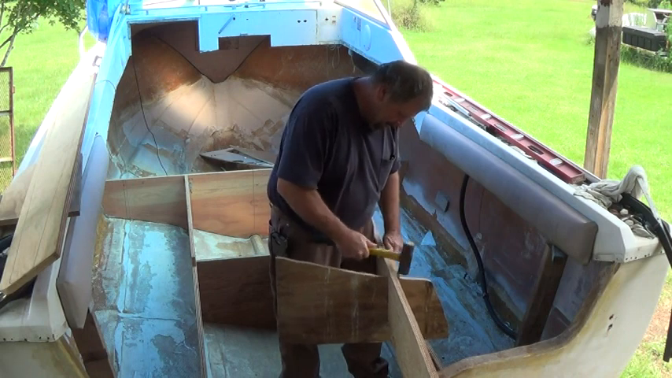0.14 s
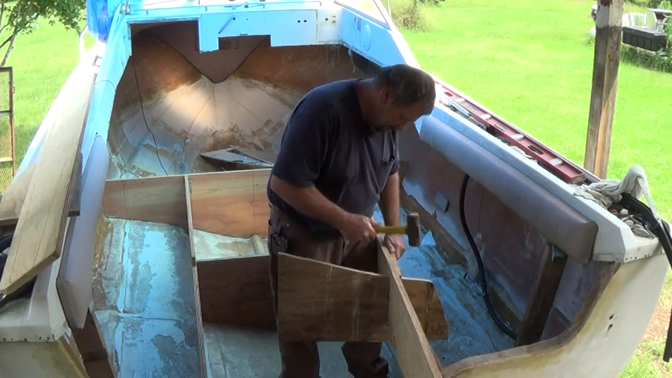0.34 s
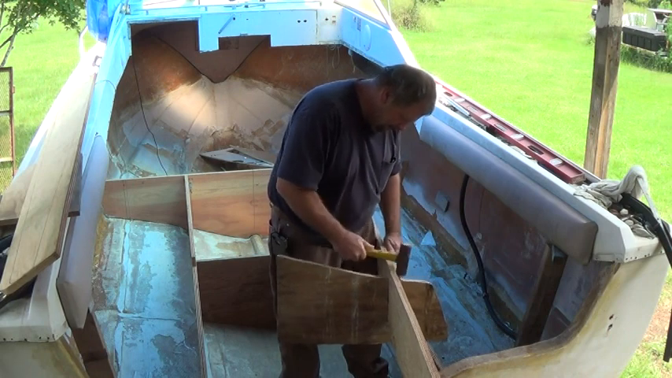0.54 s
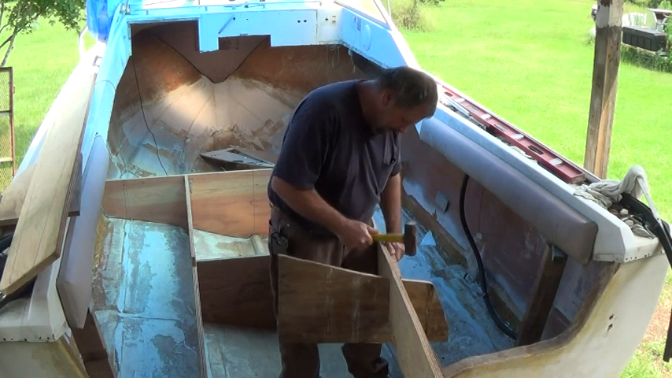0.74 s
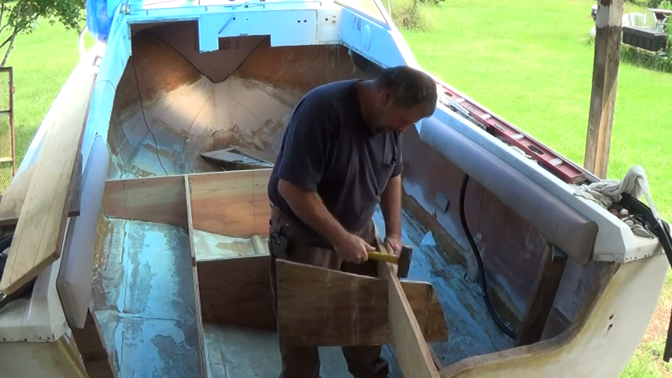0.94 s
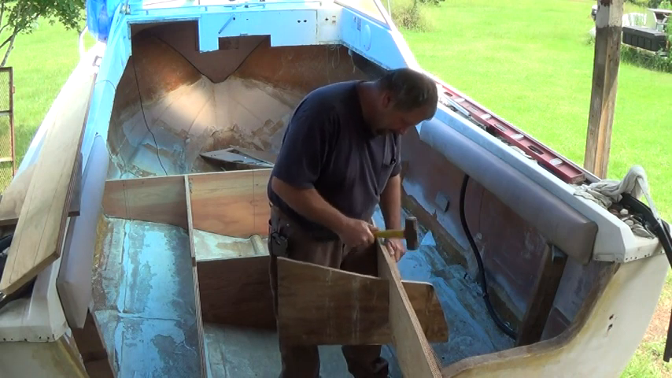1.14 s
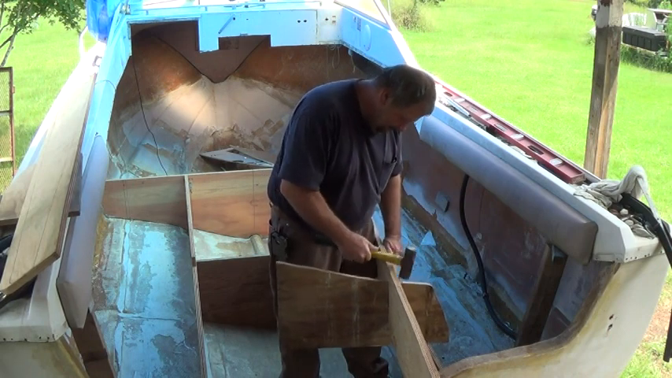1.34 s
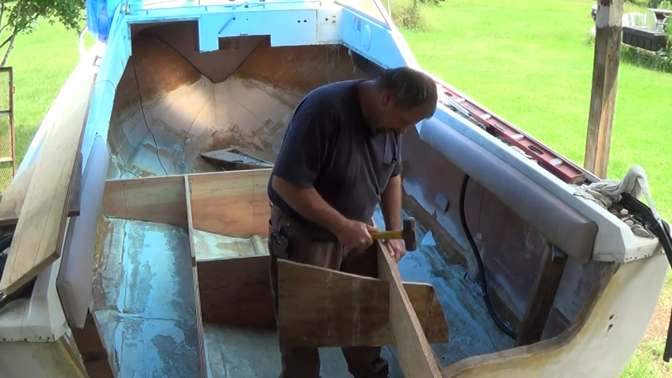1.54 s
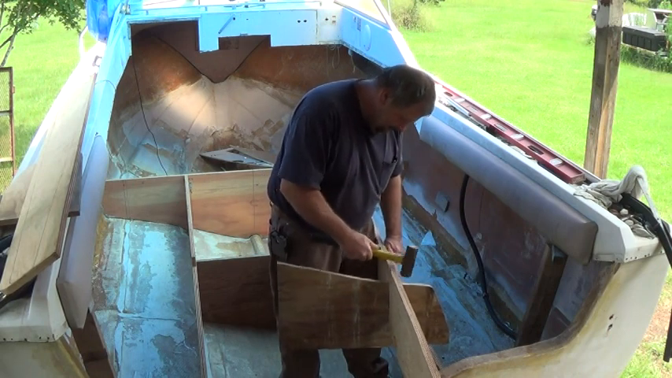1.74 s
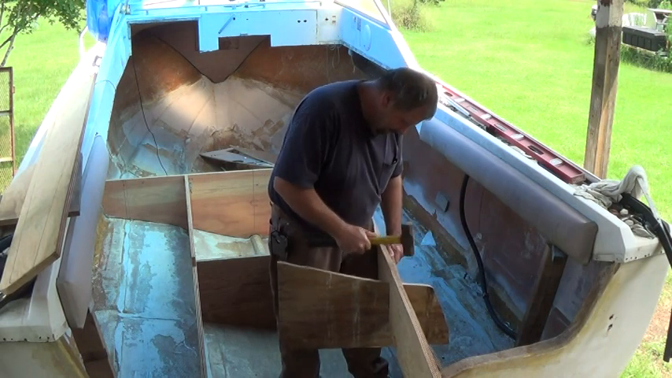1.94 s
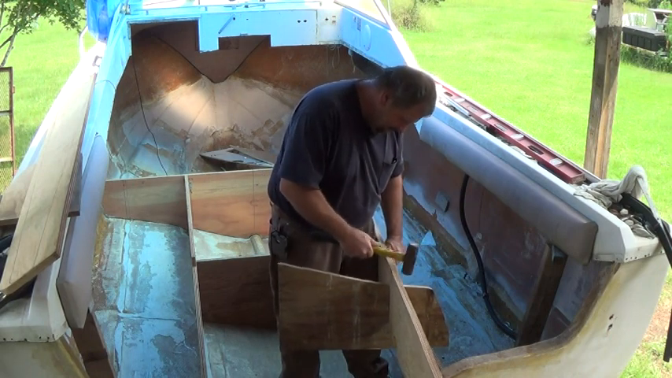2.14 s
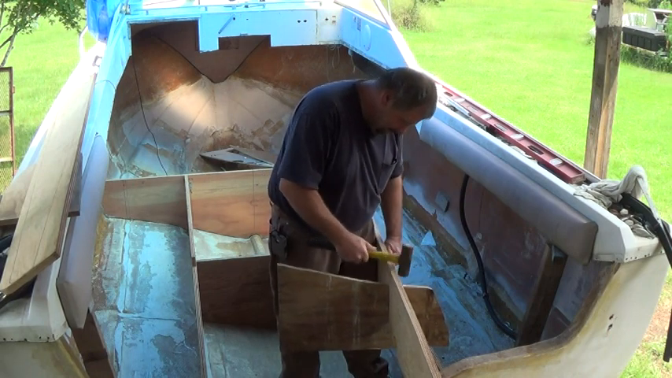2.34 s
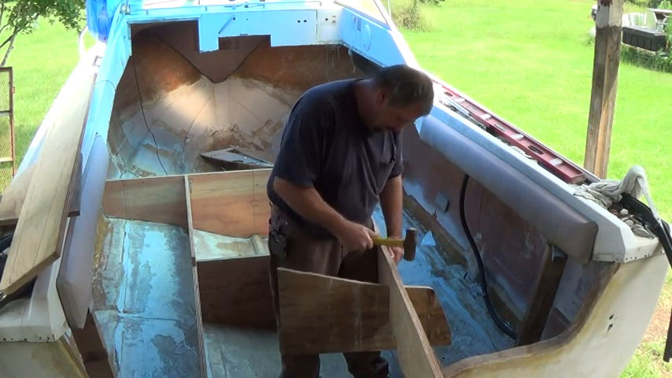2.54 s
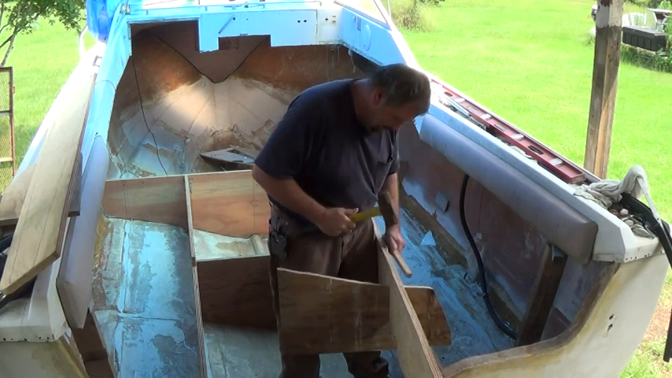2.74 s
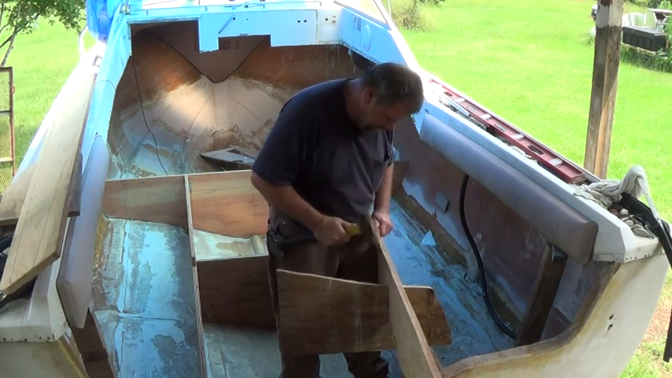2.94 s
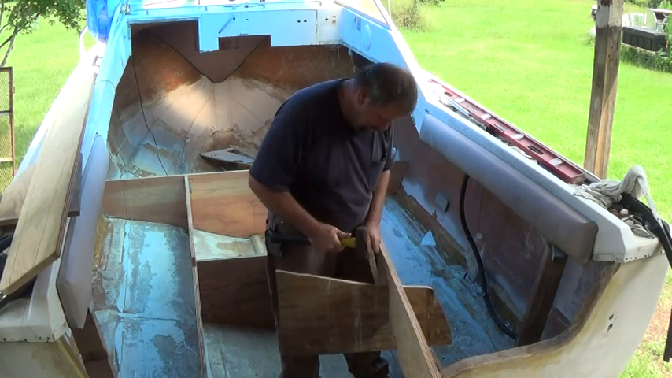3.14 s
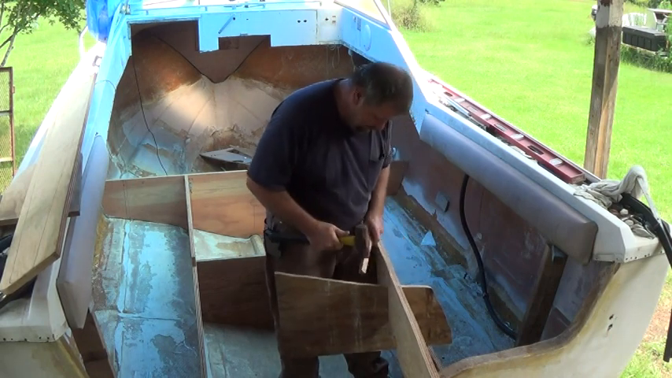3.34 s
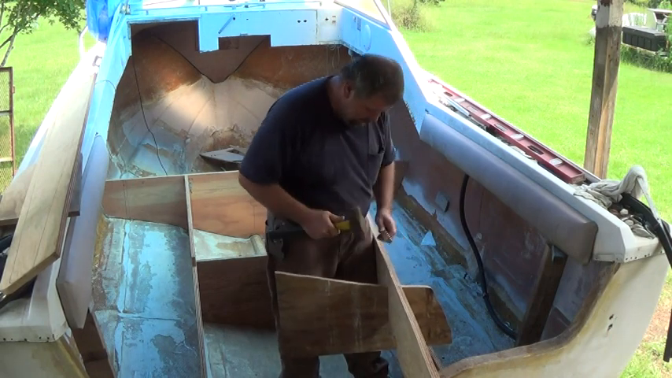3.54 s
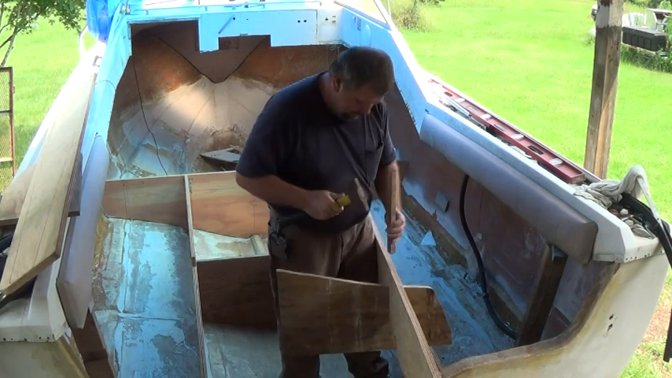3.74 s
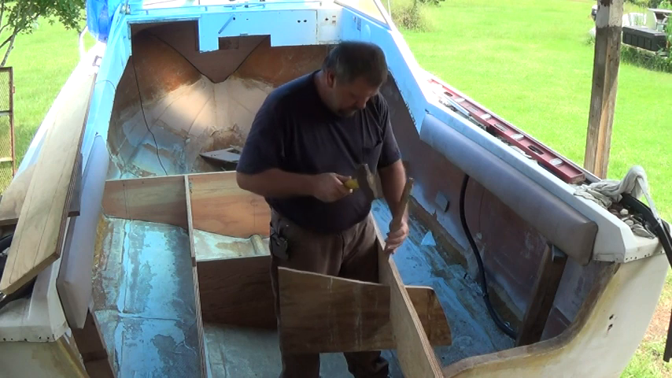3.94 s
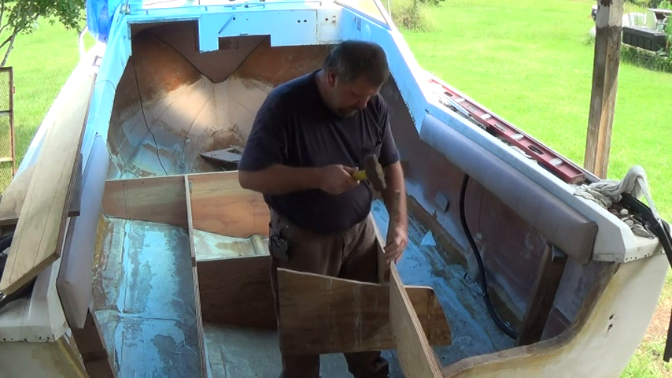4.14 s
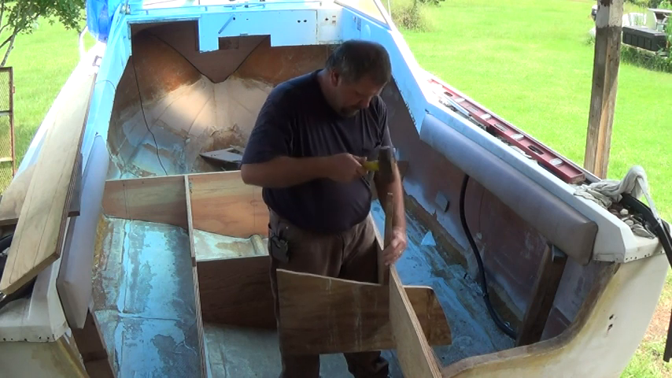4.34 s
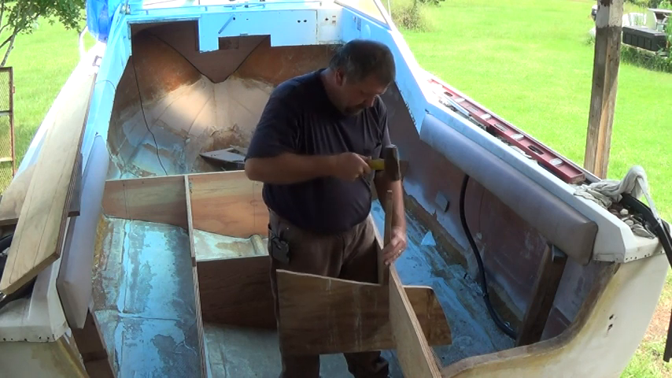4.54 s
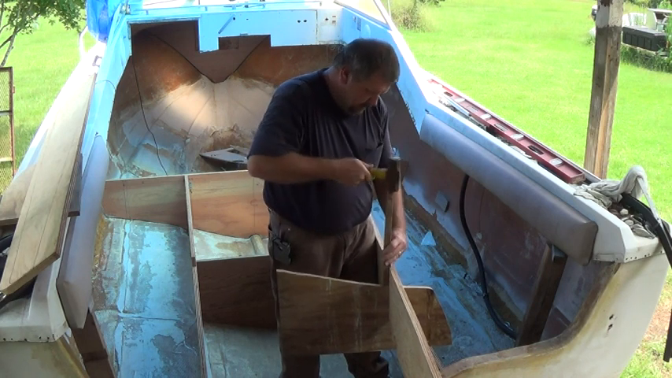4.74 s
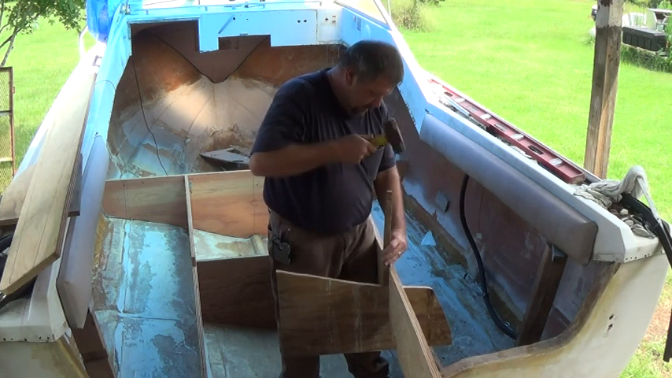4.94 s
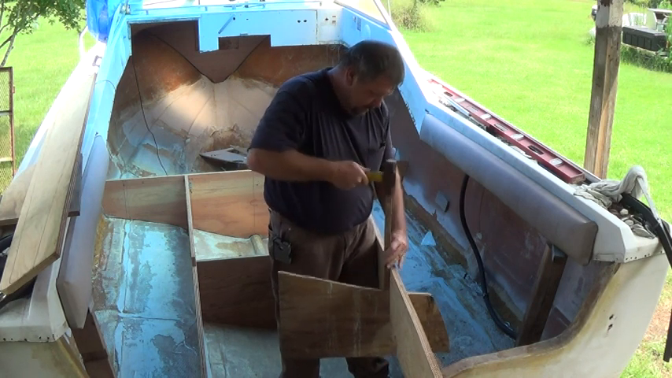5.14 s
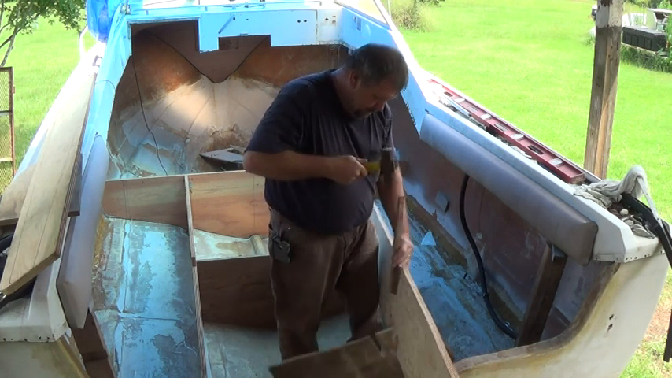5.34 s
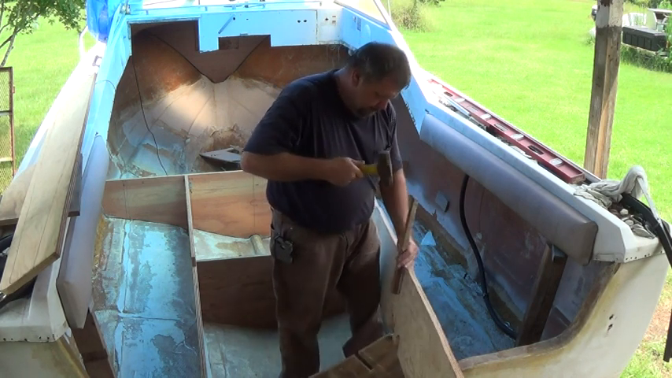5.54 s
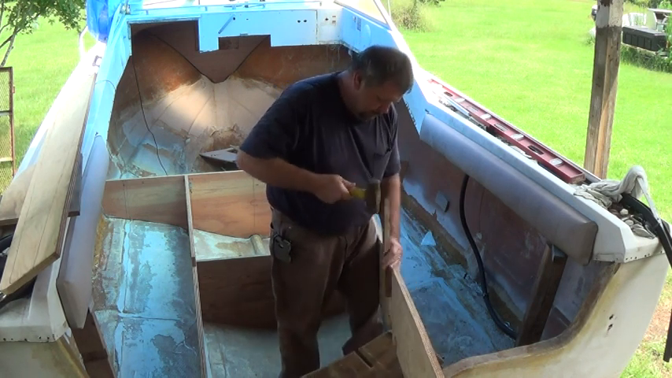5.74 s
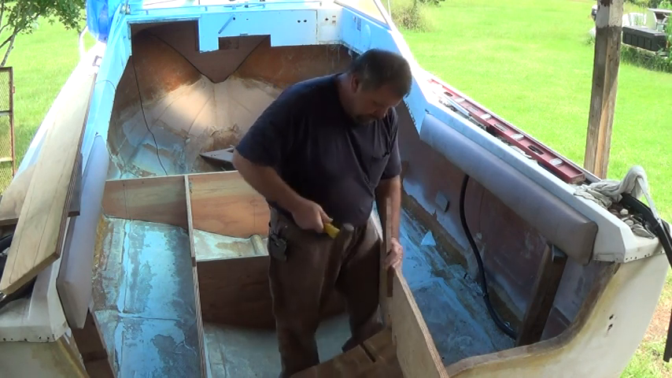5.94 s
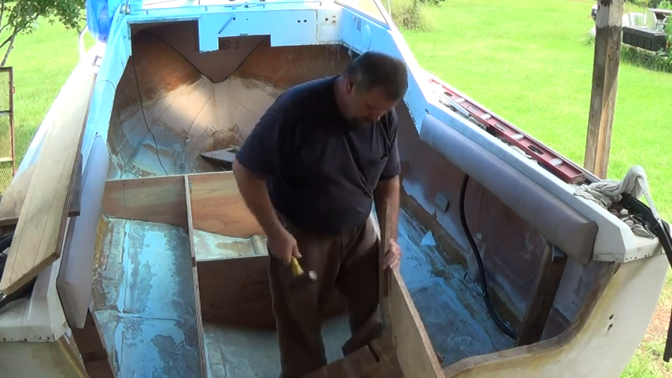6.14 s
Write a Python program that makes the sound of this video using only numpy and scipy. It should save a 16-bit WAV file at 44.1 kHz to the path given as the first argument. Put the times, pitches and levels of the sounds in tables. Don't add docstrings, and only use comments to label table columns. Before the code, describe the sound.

Outdoors under a shed roof, thin insect song and soft yard air lie behind loud, regular wooden knocks from a mallet on a steel chisel, each resonating briefly in the hull. The worker pauses with scuffs, faint squeaks, a chisel clunk and taps. A last blow brings a short falling grind, a heavy low thud, gritty ticks, a bounce and a final rub. Close stereo camera pickup, compressed peaks.

```python
import sys
import numpy as np
from scipy import signal
from scipy.fft import rfft, irfft
from scipy.io import wavfile
from scipy.ndimage import uniform_filter1d, minimum_filter1d

SR = 44100
rng = np.random.default_rng(int(sys.argv[2]) if len(sys.argv) > 2 else 0)


def how_loud(loudness_db):
    steps = np.asarray(loudness_db, float) / 20
    return 10 ** steps


def to_wav(sig):
    pcm = np.clip(np.atleast_2d(sig), -1, 1) * 32767
    pcm = np.round(pcm).astype(np.int16)
    wavfile.write(sys.argv[1], SR, pcm.T)


N = 272979


def evened(x):
    return x / np.sqrt(np.mean(x ** 2) + 1e-20)


def read(points, hz):
    f, value = np.transpose(points)
    return np.interp(np.log(hz + 1), np.log(f + 1), value)


def add(mix, s, sound):
    part = mix[:, round(s * SR):][:, :sound.shape[1]]
    part += sound[:, :part.shape[1]]


def coloured(spectrum, size):
    gain = how_loud(read(spectrum, np.fft.rfftfreq(size, 1 / SR)))
    white = rng.standard_normal((2, size))
    return evened(irfft(rfft(white) * gain, size))


def wander(hz):
    return evened(signal.lfilter([1], [1, -np.exp(-2 * np.pi * hz / SR)], rng.standard_normal(N)))


def lumps(size, width):
    return evened(signal.oaconvolve(rng.standard_normal(size), np.hanning(int(width)), "same"))


def stroke(t, top_s, rise_db_per_s, fall_db_per_s):
    return np.minimum(rise_db_per_s * (t - top_s), -fall_db_per_s * (t - top_s))


def modes(table, t, rise_cycles, spread_db):
    hz, db, t60 = np.transpose(table)[:, :, None]
    chance = rng.standard_normal((5, 2, len(table), 1))
    turn = 2 * np.pi * hz * (1 + 0.00492 * chance[0]) * t
    tone = np.sin(turn + 3 * chance[1])
    partner = 0.7 * np.sin(turn * (1 + 0.03 * chance[3]) + 3 * chance[4])
    swell = (1 - np.exp(-t * hz / rise_cycles)) ** 2
    decay = how_loud(db + spread_db * chance[2] - 60 * t / t60)
    return (decay * swell * (tone + partner)).sum(1)


# frequency in Hz, then likeness as a share, left-right level in dB or left's lead in radians.
HULL_PORTS = [
    [(30, .4), (60, .95), (150, .99), (300, .95), (600, .86), (1200, .84), (2400, .87), (5000, .91), (9000, .98), (12000, .985)],
    [(30, 2), (70, -3.5), (160, -7.5), (300, -7), (600, -3.4), (1200, -.9), (2400, -.2), (15000, -.5)],
    [(0, 0), (260, -0.7), (780, -0.3), (3790, -0.1), (7060, -0.1), (7750, -0.7), (8440, -0.2), (9650, -0.1), (16700, 0.0)],
]
YARD_PORTS = [
    [(60, .96), (180, .99), (550, .8), (1650, .45), (5000, .75), (7700, .75), (9500, .96), (12000, .99)],
    [(60, -0.5), (180, -1.5), (550, -0.5), (1650, 1.5), (4970, -2.0), (15000, 0.0)],
    [(0, 0), (2930, -0.2), (6980, -0.1), (7410, -1.4), (8700, -0.2), (16700, 0.1)],
]


def ports(x, pair):
    hz, (direct, scattered) = np.fft.rfftfreq(N, 1 / SR), rfft(x)
    same, lean_db, lead = (read(table, hz) for table in pair)
    same = np.clip(same, 0, 1)
    mid = np.sqrt((1 + same) / 2) * direct
    rest = np.sqrt((1 - same) / 2) * scattered
    tilt = how_loud(lean_db / 2) * np.exp(0.5j * lead)
    return irfft([(mid + rest) * tilt, (mid - rest) / tilt], N)


# frequency in Hz, density in dB per Hz.
YARD_AIR = [(20, -26), (40, -7.5), (76, -2), (108, 3), (190, -12), (256, -4.5), (344, -9), (734, -14.5),
            (2410, -23), (6400, -28), (9000, -24.5), (13000, -30), (16000, -28.5)]
YARD_DB = -48.5


def yard():
    return ports(how_loud(YARD_DB + 0.43 * wander(3.9)) * coloured(YARD_AIR, N), YARD_PORTS)


# centre in Hz, width in Hz, level in dB.
INSECT_BANDS = [(7675, 480, 3), (8350, 420, -6.5), (10900, 2500, -12.5)]
INSECTS_DB = -54


def insects():
    hz = np.fft.rfftfreq(N, 1 / SR)
    bands = sum(how_loud(db) * np.exp(-2 * ((hz - f) / width) ** 2) for f, width, db in INSECT_BANDS)
    song = evened(irfft(rfft(rng.standard_normal((2, N))) * bands, N))
    return ports(song * how_loud(INSECTS_DB + 0.6 * wander(25)), YARD_PORTS)


# time of the top in seconds, top level in dB.
WEIGHT_SHIFTS = [(0.01, -52), (1.3, -70), (2.2, -57), (2.75, -47), (3.23, -60), (4.5, -64), (6.19, -54)]
SHIFT_RISE_DB_PER_S, SHIFT_FALL_DB_PER_S = 53, 53.5


def murmur():
    t = np.arange(N) / SR
    hull = coloured([(90, -54), (140, 11), (300, -2.5), (450, 4.5), (900, -56.5)], N)
    hull *= sum(how_loud(db + stroke(t, s, SHIFT_RISE_DB_PER_S, SHIFT_FALL_DB_PER_S)) for s, db in WEIGHT_SHIFTS)
    return ports(hull, HULL_PORTS)


# middle in seconds, length in seconds,
# level in dB, top in Hz, pitch drop at the ends as a share.
SQUEAKS = [
    (3.49, .26, -61, 12900, .09),
    (3.41, 0.18, -72, 4850, .03),
    (4.6, 0.256, -56.5, 360, 0.017),
    (3.22, 0.065, -45.5, 285, 0.026),
]


def squeaks():
    mix = np.zeros((2, N))
    for s, length, db, hz, drop in SQUEAKS:
        u = np.linspace(-1, 1, round(length * SR))
        pitch = hz * (1 - drop * u ** 2 + 0.008 * lumps(len(u), 300))
        turn = 2 * np.pi * np.cumsum(pitch) / SR
        level = how_loud(db + 2.9 * lumps(len(u), 700)) * np.sqrt(1 - u ** 2)
        add(mix, s - length / 2, level * np.array([np.sin(turn), np.cos(turn)]))
    return ports(mix, YARD_PORTS)


# start in seconds, rise in seconds, fall in seconds, top level in dB.
RUBS = [(2.919, .015, .05, -56), (3.13, 0.023, 0.32, -45.5), (4.14, 0.023, 0.3, -49.5),
        (4.269, 0.068, 0.06, -50.5), (4.98, .11, 0.11, -52.5), (6.055, 0.06, 0.092, -34)]
# frequency in Hz, density in dB per Hz.
RUB_COLOUR = [(88, -36), (150, 2.5), (278, -33), (433, 1.5), (601, -11), (714, -4), (2310, -10.5),
              (9630, -18), (15000, -22)]
RUB_ENDS_DB = -17.5


def rubs():
    mix = np.zeros((2, N))
    for s, rise, fall, db in RUBS:
        t = np.arange(0, rise + fall, 1 / SR)
        grain = how_loud(0.93 * lumps(len(t), 250))
        level = how_loud(db + stroke(t, rise, -RUB_ENDS_DB / rise, -RUB_ENDS_DB / fall))
        add(mix, s, level * evened(coloured(RUB_COLOUR, len(t)) * grain))
    return ports(mix, HULL_PORTS)


# start in seconds, level in dB, centre in Hz.
GRIT_TICKS = [(1.2994, -49, 11100), (2.7616, -46, 11600), (2.94, -48, 10050), (3.03, -52.5, 13400),
              (3.2615, -51, 14000), (3.7678, -52, 10500), (4.1764, -48.5, 10200), (4.5286, -52, 10900),
              (5.293, -33, 10100), (5.4099, -38, 10000), (5.6456, -43, 10900), (5.791, -41, 11100)]


def ticks():
    mix = np.zeros((2, N))
    t = np.arange(800) / SR
    for s, db, hz in GRIT_TICKS:
        burst = coloured([(hz * 0.37, -30), (hz, 0), (hz * 1.5, -20)], len(t))
        add(mix, s, how_loud(db - 0.5 - 60 * t / 0.063) * burst)
    return ports(mix, HULL_PORTS)


# (frequency in Hz, level in dB, t60 in seconds).
CLINKS = [
    (3.462, -26, [(394, -10, 0.082), (902, -8.5, 0.061), (1174, -5, 0.062), (1530, -17, 0.051), (2030, 0, 0.055), (2106, -6, 0.16), (2780, -17, 0.052), (2980, -14.5, 0.049)]),
    (5.793, -29.5, [(1010, -15, 0.11), (1626, -20.5, 0.12), (1990, -6, 0.17), (2350, -11.5, .06), (3580, -22, 0.074)]),
]


def clinks():
    mix = np.zeros((2, N))
    t = np.arange(SR // 4) / SR
    for s, db, steel in CLINKS:
        echoes = coloured([(250, -15), (500, 2.5), (1100, -0.5), (3200, -10.5), (6000, -17.5)], len(t))
        echoes *= how_loud(-13.5 - 60 * t / 0.44)
        add(mix, s, how_loud(db) * (modes(steel, t, 0.95, spread_db=2.5) + echoes))
    return ports(mix, HULL_PORTS)


# frequency in Hz, density in dB per Hz.
GRIND_COLOUR = [(50, -25), (160, 2.5), (280, -36), (440, -2), (800, -9.5), (1330, -11.5), (2000, -19.5),
                (3500, -30.5), (7000, -64), (16000, -80)]
SLIDE_START_S, SLIDE_TOP_S, SLIDE_END_S = 5.265, 5.325, 5.47
SLIDE_DB, SLIDE_START_DB, SLIDE_END_DB = -6, -16, -32.5
GROAN_TIGHT_HZ, GROAN_LOOSE_HZ, LOOSEN_S, LOOSEN_SPREAD_S = 560, 387, 5.31, 0.0097


def slide():
    t = np.arange(SLIDE_START_S, SLIDE_END_S, 1 / SR)
    times = [SLIDE_START_S, SLIDE_TOP_S, SLIDE_END_S]
    db = SLIDE_DB + np.interp(t, times, [SLIDE_START_DB, 0, SLIDE_END_DB])
    loose = 1 / (1 + np.exp((LOOSEN_S - t) / LOOSEN_SPREAD_S))
    pitch = GROAN_TIGHT_HZ + (GROAN_LOOSE_HZ - GROAN_TIGHT_HZ) * loose
    turn = np.exp(2j * np.pi * np.cumsum(pitch) / SR)
    r = np.exp(-np.pi * 40 / SR)
    drive = rng.standard_normal((2, len(t))) / turn
    groan = evened((turn * signal.lfilter([1], [1, -r], drive)).real)
    judder = how_loud(1.1 * lumps(len(t), 410))
    mix = np.zeros((2, N))
    add(mix, SLIDE_START_S, how_loud(db) * judder * (coloured(GRIND_COLOUR, len(t)) + how_loud(-3.5) * groan))
    return ports(mix, HULL_PORTS)


# frequency in Hz, density in dB per Hz.
CLATTER = [(24, -46), (40, -7.5), (112, 5), (382, 2.5), (790, -5.5), (1070, -8.5), (1210, -9.5),
           (2260, -9.5), (2630, -14), (3380, -14), (5870, -26), (10700, -30), (16000, -41)]
# frequency in Hz, t60 in seconds.
RING_OUT = [(80, 0.8), (210, 0.6), (560, 0.49), (1470, 0.4), (3880, 0.34), (10200, 0.27)]
# frequency in Hz, rise time in seconds.
BUILD_UP = [(60, 0.0039), (200, 0.0093), (600, 0.0048), (1500, 0.0025), (4000, 0.0009)]
# frequency in Hz, level in dB, t60 in seconds.
CAVITY = [(133.9, -12.5, 0.63), (159.64, -1, 0.4), (169.1, -6, 0.42)]
# frequency in Hz, level in dB, t60 in seconds.
CHISEL = [(1925, 6, 0.05), (1866, -33, 0.39), (2530, -35, 0.033), (4260, 0.5, 0.018), (2520, -8, 0.047)]


def knock(body, db, bright_db, boom_db, ring_db, length):
    t = np.arange(SR * 3 // 5) / SR
    hz = np.fft.rfftfreq(len(t), 1 / SR)
    z = rfft(coloured(CLATTER, len(t)))
    z *= how_loud(bright_db * np.log2((np.minimum(hz, 8000) + 100) / 600))
    z *= hz ** 2 / (hz ** 2 + 150 ** 2)
    z *= how_loud(2.6 * lumps(len(hz), 36))
    clatter = np.zeros((2, len(t)))
    for octave in np.arange(6, 15):
        band = np.cos(np.pi / 2 * np.clip(np.log2(hz + 1) - octave, -1, 1)) ** 2
        swell = 1 - np.exp(-t / read(BUILD_UP, 2. ** octave))
        crack = 1 + 0.95 * np.exp(-t / 0.00067)
        rattle = how_loud(0.86 * lumps(len(t), 470))
        decay = how_loud(-60 * t / length / read(RING_OUT, 2. ** octave))
        clatter += irfft(z * band, len(t)) * swell * crack * rattle * decay
    wood = modes(body, t, 3, spread_db=3)
    boom = modes(CAVITY, t, 6, spread_db=1)
    ring = modes(CHISEL, t, 7, spread_db=1.5)
    low = how_loud(3.5) * wood + how_loud(boom_db + 7.5) * boom
    low *= how_loud(60 * t / 0.65 * (1 - 1 / length))
    return how_loud(db) * (clatter + low + how_loud(ring_db + 1) * ring)


def soft_knocks(table, body, over_db, contact_s):
    mix = np.zeros((2, N))
    for s, db, bright_db, boom_db, length in table:
        sound = knock(body, db + over_db, bright_db, boom_db, -44, length)
        onset = 1 - np.exp(-np.arange(sound.shape[1]) / SR / contact_s)
        add(mix, s - 0.001, sound * onset)
    return ports(mix, HULL_PORTS)


# start in seconds, strength in dB, brightness in dB
# per octave, hull boom in dB, ring-out factor.
TAPS = [(0.618, -32, 8.5, -7, 0.3), (1.372, -50, -8, -11, .3), (2.448, -23, 8.5, -31, 0.66),
        (2.854, -46.5, 3.5, -15, 0.74), (4.119, -29.5, -2.5, -8, 0.72), (4.36, -41.5, -8, 13.5, 0.28),
        (4.743, -22, 0.5, 6, 0.62), (5.489, -17.5, 2.5, -25, 0.98)]
# frequency in Hz, level in dB, t60 in seconds.
RIM = [(276, -4.5, 0.5), (405, -33.5, 0.27), (585, -13, 0.49), (755, -11, 0.27), (797, -14, 0.59),
       (982, -7.5, 0.096), (1540, -22, 0.088)]


def taps():
    return soft_knocks(TAPS, RIM, over_db=-4, contact_s=0.00085)


# start in seconds, strength in dB, brightness in dB per octave, hull boom in dB, ring-out factor.
BOUNCES = [
    (5.388, -25, -1, 3.2, 1),
    (5.488, -3.5, -6, 1.7, 0.8),
    (5.652, -22, -5.5, 4.8, 0.82),
    (6.165, -44, -10, 13, 0.65),
]
# frequency in Hz, level in dB, t60 in seconds.
PANEL = [(95, -0.5, 0.21), (252, -1, 0.29), (283, -9.5, 0.42), (319.4, -9, 0.52), (371, -2.5, 0.34),
         (414.4, -16.5, 0.3), (481, -12, 0.2), (554, -5, 0.076), (621, 5, 0.053)]


def bounces():
    return soft_knocks(BOUNCES, PANEL, over_db=4, contact_s=0.0083)


# start in seconds, strength in dB, brightness in dB per octave,
# hull boom in dB, chisel ring in dB.
BLOWS = [
    (0.192, -10, 2.2, -5, -4),
    (0.626, -10.5, 0.84, -5.5, -27),
    (1.006, -14.5, 1.2, 1.4, 4.5),
    (1.377, -12, -0.76, -0.5, -1),
    (1.738, -13.5, 1.45, -0.6, 0),
    (2.098, -14, 1.62, -3.5, -2.5),
    (2.443, -9, -2, -3, -9),
    (5.219, -14.5, 2.7, -7.5, -2),
]
# frequency in Hz, level in dB, t60 in seconds.
HULL = [(46.4, -26, 0.72), (75.9, -19.5, 0.58), (94, -5, 0.18), (223.6, -24, 0.62), (277.4, -13.5, 0.43),
        (375, -9, 0.36), (440.7, -13.5, 0.35), (481, -14, 0.34), (542, -16, 0.28), (613, -10.5, 0.096),
        (748, -20, 0.25), (796, -15, 0.24), (1005, -32, 0.51), (905, -20, 0.4), (1200, -22.5, 0.34),
        (1382, -20, 0.26), (1514, -23.5, 0.33), (1850, -41, 0.42)]
BLOW_RING_OUT = 0.74


def blows():
    mix = np.zeros((2, N))
    for s, db, bright_db, boom_db, ring_db in BLOWS:
        add(mix, s - 0.001, knock(HULL, db + 6.5, bright_db, boom_db, ring_db, BLOW_RING_OUT))
    return ports(mix, HULL_PORTS)


def scene():
    background = yard() + insects() + murmur()
    handling = squeaks() + rubs() + ticks() + clinks()
    return background + handling + slide() + taps() + bounces() + blows()


# middle of the step in seconds, gain in dB.
GAIN_STEPS = [
    (2.52, -2),
    (5.44, -4),
]
STEP_S, RECOVER_DB_PER_S = 0.36, 1


def slow_gain(dry):
    t = np.arange(N) / SR
    steps_db = 0
    for s, db in GAIN_STEPS:
        onset = np.clip((t - s) / STEP_S + 0.5, 0, 1)
        steps_db = steps_db + onset * np.minimum(db + RECOVER_DB_PER_S * (t - s), 0)
    return dry * how_loud(steps_db)


def limiter(x):
    t = np.arange(N) / SR
    peak_db = 20 * np.log10(abs(x).max(0) + 1e-9)
    fast = np.maximum.accumulate(peak_db + 300 * t) - 300 * t
    slow = np.maximum.accumulate(peak_db + 25 * t) - 25 * t
    cut_db = 0.8 * np.maximum(fast + 5.9, 0) + 0.031 * np.maximum(slow + 16, 0)
    cut_db = -minimum_filter1d(-cut_db, size=61)
    return x / how_loud(uniform_filter1d(cut_db, size=41))


# frequency in Hz, level in dB.
WHINE = [(15734.3, -68), (15747.3, -73.5)]


def whine():
    t = np.arange(N) / SR
    return sum(how_loud(db) * np.sqrt(2) * np.sin(2 * np.pi * hz * t) for hz, db in WHINE)


def low_pass(x):
    return signal.sosfilt(signal.butter(12, 17150, fs=SR, output="sos"), x)


def record(dry):
    held = limiter(slow_gain(dry))
    edge = signal.firwin(301, 15850, fs=SR)
    held = signal.oaconvolve(held, edge[None], "same")
    return low_pass(held + whine())


dry = scene()
out = record(dry)
to_wav(out)
```